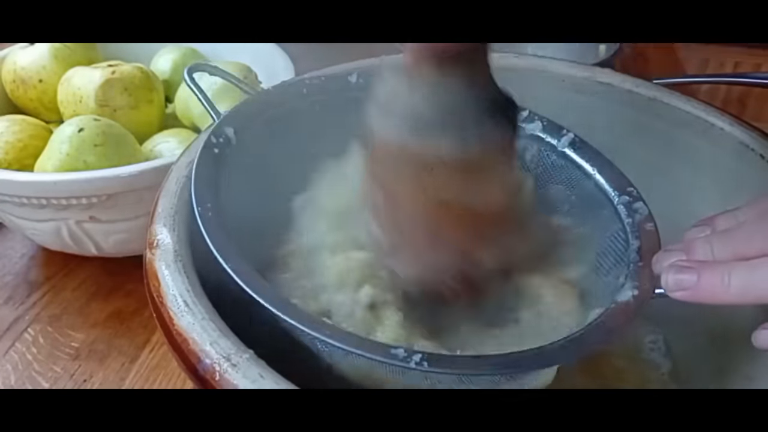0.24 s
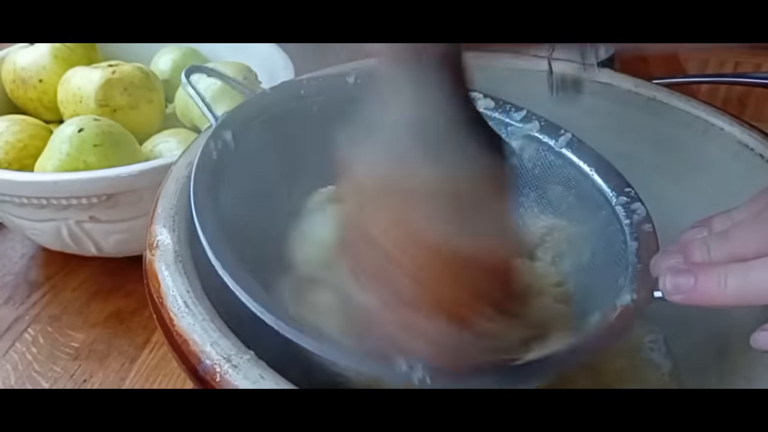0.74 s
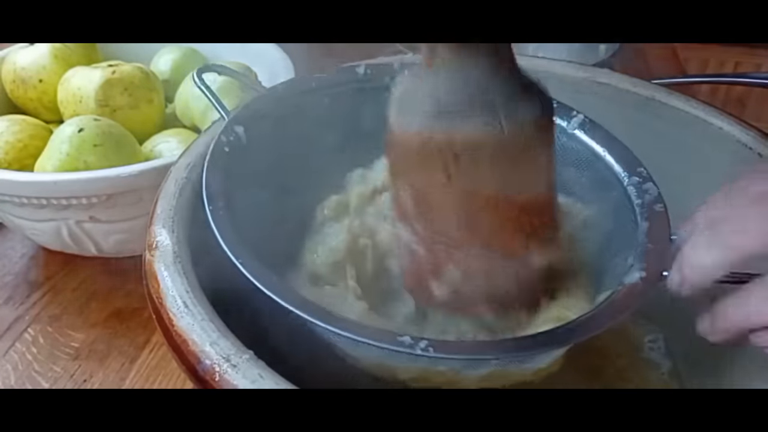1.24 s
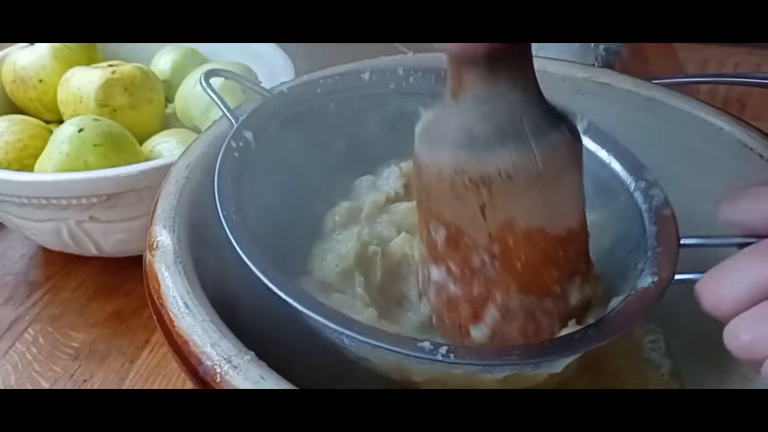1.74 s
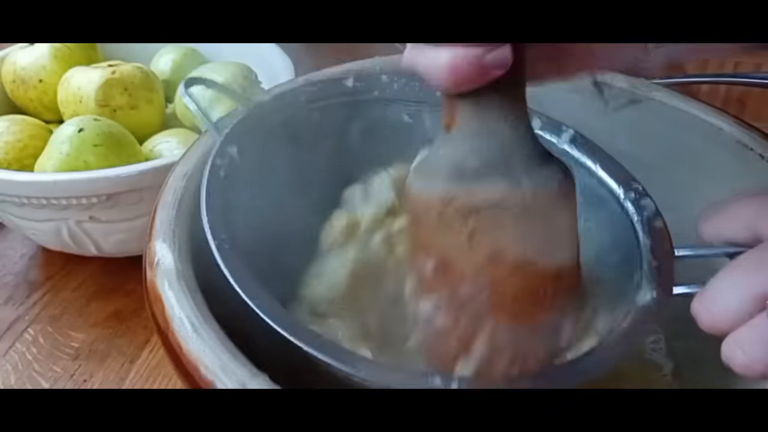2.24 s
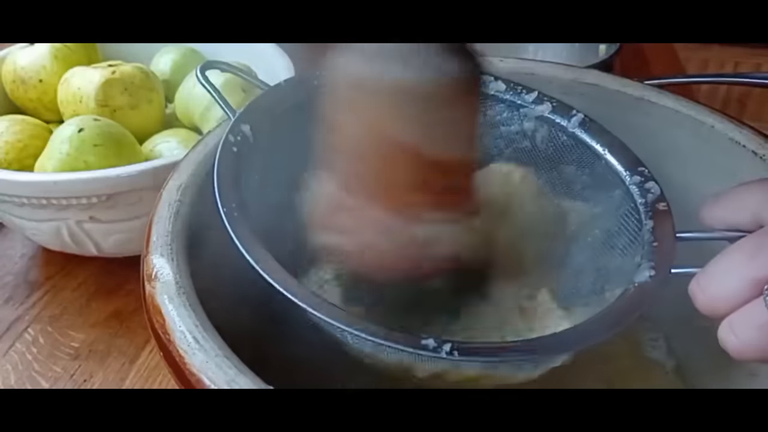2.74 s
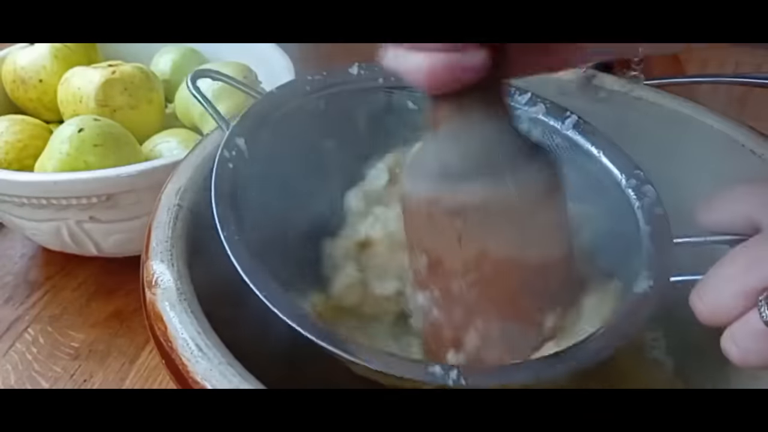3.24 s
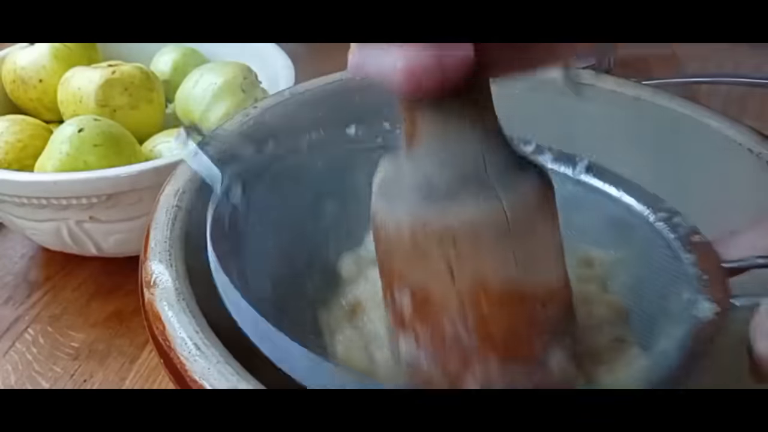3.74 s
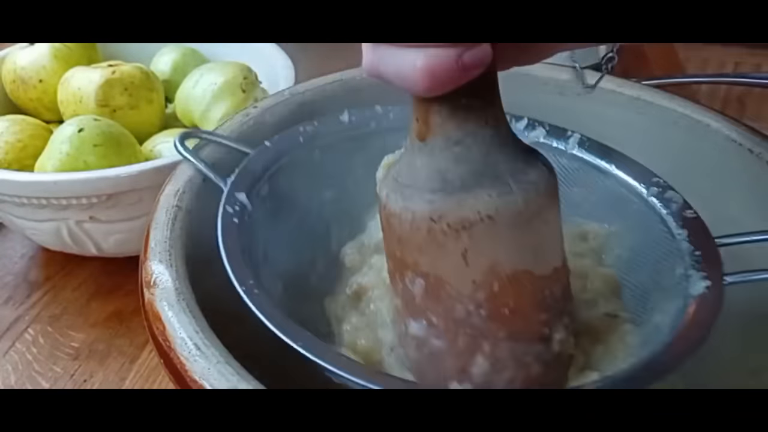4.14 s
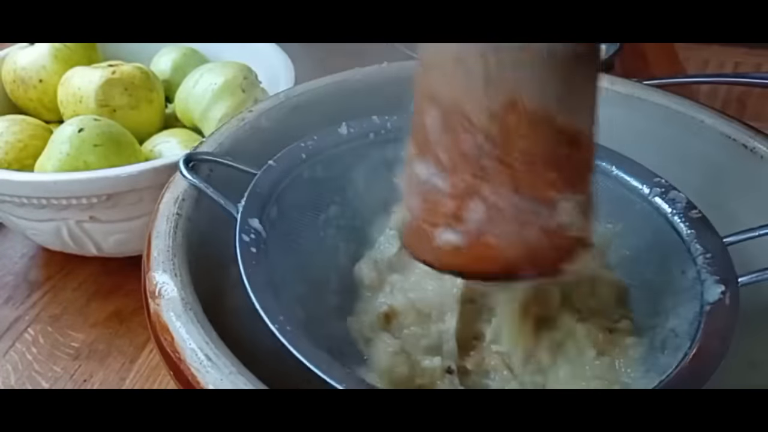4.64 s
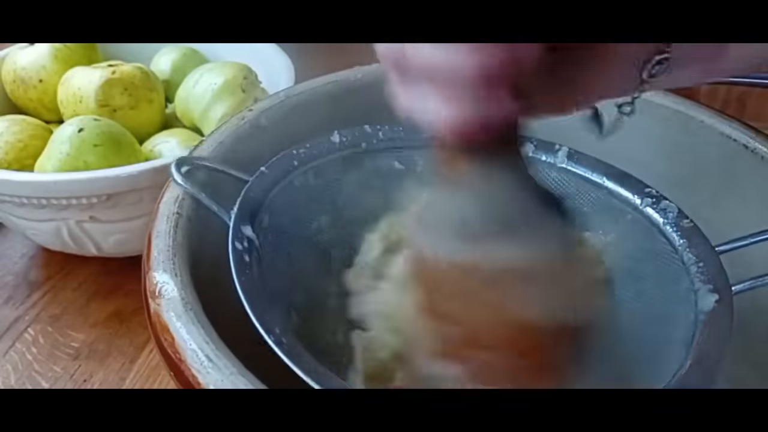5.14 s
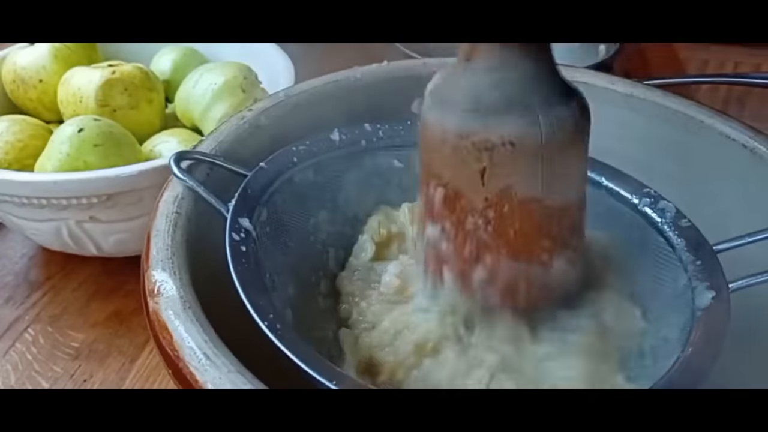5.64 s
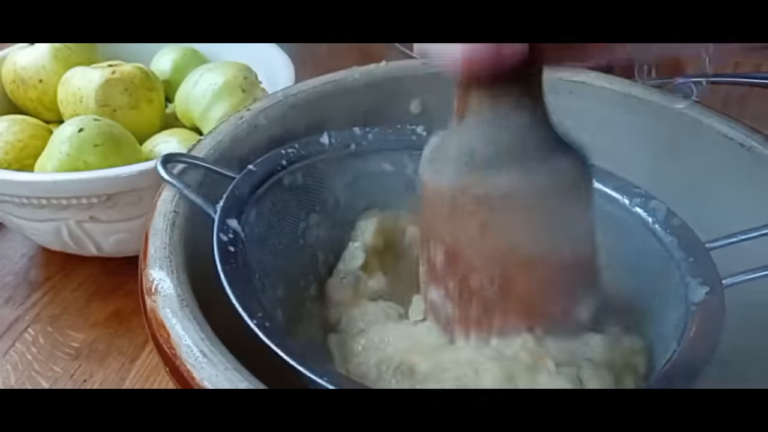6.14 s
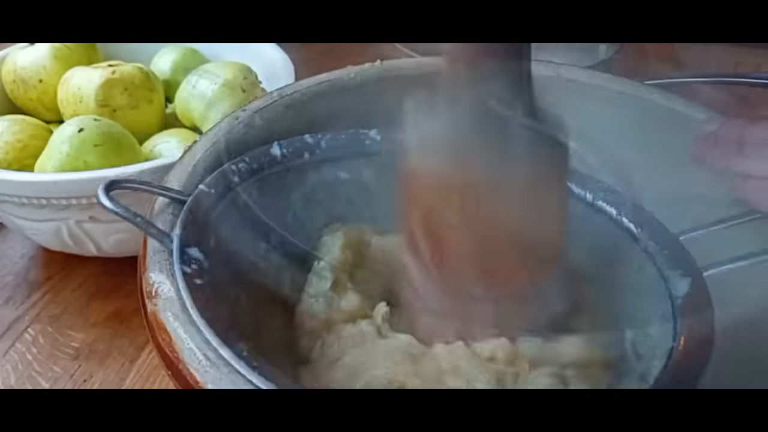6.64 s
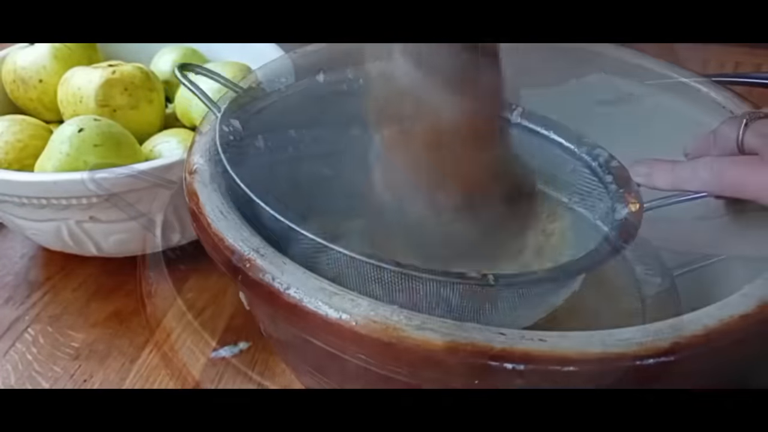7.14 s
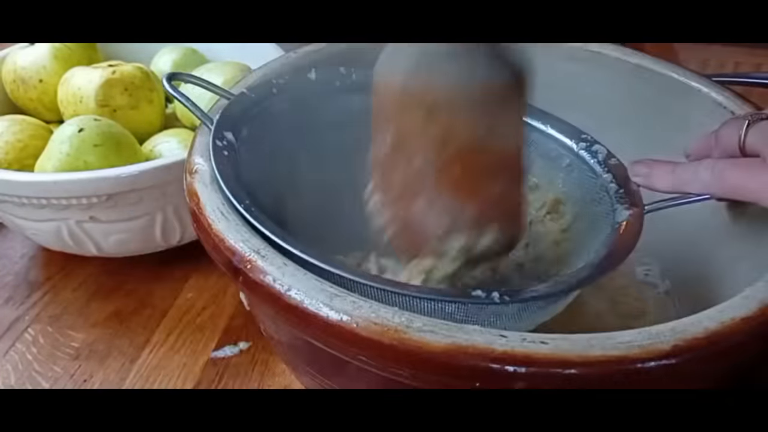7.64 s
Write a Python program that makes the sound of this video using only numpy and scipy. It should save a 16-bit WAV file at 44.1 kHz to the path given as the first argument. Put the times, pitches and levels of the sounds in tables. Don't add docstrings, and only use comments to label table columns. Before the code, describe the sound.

Irregular wet thuds and squelches of pulp pressed through a sieve, each with a crisp wire snap and dull stoneware knock. Early blows are separated by near silence; denser twisting follows, with sticky pops and rim rattles. After faint whistles of escaping air and a low table thump, steady brisk pounding runs on. Close stereo microphone, short dry kitchen reflections, very faint room murmur.

```python
import sys
import numpy as np
from scipy import signal
from scipy.fft import rfft, irfft, next_fast_len
from scipy.io import wavfile
from scipy.ndimage import map_coordinates

SR = 44100
rng = np.random.default_rng(int(sys.argv[2]) if len(sys.argv) > 2 else 0)


def boost_factor(decibels):
    exponent = np.asarray(decibels, float) / 20
    return 10 ** exponent


def to_wav(sig):
    pcm = np.clip(np.atleast_2d(sig), -1, 1) * 32767
    pcm = np.round(pcm).astype(np.int16)
    wavfile.write(sys.argv[1], SR, pcm.T)


N = 347943


def rms_one(x):
    return x / np.sqrt(np.mean(x ** 2) + 1e-20)


def in_time(rows):
    s, *columns = np.transpose(rows)
    return [np.interp(np.arange(N) / SR, s, column) for column in columns]


def at_hz(points, hz):
    table_hz, value = np.transpose(points)
    return np.interp(np.log(hz), np.log(table_hz), value)


def colour(x, points, size=4096):
    hz = np.maximum(np.arange(size // 2 + 1), 1) * SR / size
    cepstrum = irfft(np.log(boost_factor(at_hz(points, hz))))
    cepstrum[1:size // 2] *= 2
    cepstrum[size // 2 + 1:] = 0
    kernel = irfft(np.exp(rfft(cepstrum)))
    return signal.oaconvolve(np.atleast_2d(x), [kernel / np.linalg.norm(kernel)])[:, :N]


def above(x, hz):
    return signal.sosfilt(signal.butter(4, hz, "high", fs=SR, output="sos"), x)


def drift(rate):
    r = np.exp(-80 * np.pi * rate / SR)
    slow = signal.lfilter([1], [1, -2 * r, r * r], rng.standard_normal(N // 40 + 2002))[2000:]
    return np.interp(np.arange(N) / 40, np.arange(len(slow)), rms_one(slow))


def ring(x, hz, t60):
    r, w = boost_factor(-60 / (t60 * SR)), 2 * np.pi * hz / SR
    return signal.lfilter([0, np.sin(w)], [1, -2 * r * np.cos(w), r * r], x + 1e-18)


def rough():
    return np.clip(2 * rng.standard_normal(N), -1.2, 1.2)


def grains(per_s, spread_db):
    sizes = boost_factor(spread_db * np.minimum(rng.exponential(1, N), 5)) * rng.choice([-1, 1], N)
    return rms_one(sizes * (rng.random(N) < per_s / SR))


def struck(body, force, at):
    since = np.searchsorted(at, np.arange(N), side="right")
    uneven = boost_factor(rng.uniform(-3, 3, (len(body), len(at) + 1)))
    return sum(boost_factor(db) * ring(force * share[since], hz, t60) for share, (hz, db, t60) in zip(uneven, body))


def bursts(at, db, fall_s):
    clicks = np.zeros(N)
    clicks[at] = boost_factor(db)
    return signal.lfilter([1], [1, -np.exp(-1 / (fall_s * SR))], clicks + 1e-18)


def swells(s, db, rise_s, fall_s, rest_db, hold_s=0, lead_s=9):
    t = np.arange(0, N + 64, 64)[:, None] / SR
    slope = np.maximum(s - t, 0) / rise_s + np.maximum(t - s - hold_s, 0) / fall_s
    power = boost_factor(db - 40 * slope) ** 2 * (t > s - lead_s) + 1e-30
    total = power.sum(axis=1) + boost_factor(rest_db) ** 2
    level_db = np.interp(np.arange(N) / SR, t[:, 0], 10 * np.log10(total))
    return level_db, power / power.sum(axis=1)[:, None]


def swell_and_die(events):
    out, t = np.zeros(N + 8000), np.arange(8000) / SR
    for s, db, hz, cycles in events:
        age = t * hz / max(cycles, .5) * 2
        start = int(s * SR)
        out[start:start + 8000] += boost_factor(db - 3.0) * age * np.exp(1 - age) * np.sin(2 * np.pi * hz * t)
    return out[:N]


# f/Hz, likeness -1..1
PORT_LIKENESS = [(60, 0.64), (240, 0.99), (950, -0.35), (3770, 0.8), (15000, -0.061)]
PATCHES_PER_OCTAVE, STREAK_SHARE, PATCH_DB, FLICKER_DB = 3.5, 0.59, 5.5, 3


def wide_noise(patchy_db=0):
    mid, side = signal.stft(rng.standard_normal((2, N)), nperseg=256)[2]
    alike = np.clip(at_hz(PORT_LIKENESS, (np.arange(129) + .5) * SR / 256), -1, 1)[:, None]
    octaves = PATCHES_PER_OCTAVE * np.log2(np.arange(1, 130))
    pitch, time = np.meshgrid(octaves, np.arange(mid.shape[1]) / 8, indexing="ij")
    patches = map_coordinates(rng.standard_normal((40, N // 1024 + 3)), [pitch, time], order=1)
    lanes = rng.standard_normal((129, N // 2048 + 3))
    streaks = map_coordinates(lanes, [np.indices(time.shape)[0], time / 2], order=1)
    gain = boost_factor(patchy_db * patches) * boost_factor(STREAK_SHARE * patchy_db * streaks)
    both = gain * (np.sqrt(1 + alike) * mid + np.sqrt(1 - alike) * side * [[[1]], [[-1]]])
    return rms_one(signal.istft(both, nperseg=256)[1][:, :N])


def at_ports(x, lag_s):
    size = next_fast_len(N)
    spin = np.exp(-2j * np.pi * np.arange(size // 2 + 1) * SR / size * lag_s)
    return np.array([irfft(rfft(x, size) * spin, size)[:N], x])


# f/Hz, level/dB
AIR_COLOUR = [(15, -73.5), (25, -35.5), (109, 13.5), (1610, -29), (2360, -20.5), (2710, -34.5), (3560, -34),
              (6130, -17), (8270, -47.5), (10600, -15), (13500, -58), (15500, -9), (16800, -53)]


def still_air():
    return boost_factor(-66) * colour(wide_noise(3.0), AIR_COLOUR)


def electronics():
    return boost_factor(-75) * np.sin(2 * np.pi * 15470 * np.arange(N) / SR)


KITCHEN_T60_S, WALL_CUT_HZ, KITCHEN_DB = 0.27, 7600, -23.5


def kitchen(x):
    size = next_fast_len(N + SR)
    spin = -2j * np.pi * np.arange(size // 2 + 1) / size
    dull, out = 1 / (1 - spin * SR / (2 * np.pi * WALL_CUT_HZ)), [0, 0]
    for k, lag in enumerate((rng.uniform(0.01, 0.033, 16) * SR).astype(int)):
        loop = boost_factor(-60 * lag / SR / KITCHEN_T60_S) * dull * np.exp(spin * lag)
        out[k % 2] = out[k % 2] + (-1) ** (k // 2) * loop / (1 - loop)
    return boost_factor(KITCHEN_DB) * irfft(np.array(out) * rfft(x, size), size)[:, :N]


# f/Hz, level/dB
TABLE_COLOUR = [(15, -17), (25, -30), (156, 1.5), (228, -2.5), (260, -6.5), (297, -5.5), (350, -19.5),
                (460, -30.5), (770, -120)]
# f/Hz, level/dB, t60/s
TABLE_MODES = [(104.2, -1, .3), (174, -7.5, 0.043), (210.6, -2, 0.25), (292.5, 1, 0.19)]
# t/s, level/dB
SHOVES = [(2.33, -53), (2.72, -45.5), (2.93, -49), (3.11, -46.5), (3.34, -48.5), (3.53, -49.5), (3.74, -55),
          (4.17, -49.5), (4.495, -28), (4.72, -52), (5.199, -55), (5.5, -42.5), (6.08, -62), (6.9, -43.5),
          (7.0, -47.5), (7.24, -42.5), (7.491, -29.5), (7.82, -34)]
SHOVE_RISE_S, SHOVE_HOLD_S, SHOVE_FALL_S, TABLE_REST_DB = 0.098, 0.042, 0.11, -66


def table(at, bowl_db):
    shove_db, _ = swells(*np.transpose(SHOVES), SHOVE_RISE_S, SHOVE_FALL_S, TABLE_REST_DB, SHOVE_HOLD_S)
    shove_db = np.minimum(shove_db, np.maximum(bowl_db + 10.0, -56))
    rumble = colour(boost_factor(shove_db - 5.5 + FLICKER_DB * drift(28)) * wide_noise(), TABLE_COLOUR)
    force = (boost_factor(shove_db - 37.5) + boost_factor(-102 + 2.2 * drift(6.2))) * rough()
    return rumble + struck(TABLE_MODES, force, at)


# t/s, level/dB, f/Hz, length/cycles
HUMS = [(.04, -52, 95, 6.0), (.93, -52, 60, 4.0), (1.9, -48, 100, 7.0), (2.0, -48, 95, 7.0),
        (2.46, -50, 297, 14.0), (3.13, -44, 295, 12.0), (3.33, -42, 105, 6.0), (3.53, -44, 105, 6.0),
        (4.26, -46, 95, 6.0), (4.705, -40, 100, 8.0), (6.07, -44, 100, 8.0), (6.14, -40, 470, 14.0),
        (4.37, -38, 450, 12.0)]


def hums():
    return swell_and_die([(s, db - 4.0, hz, cycles) for s, db, hz, cycles in HUMS])


# t/s, level/dB, f/Hz, length/cycles
BUMPS = [(0.167, -32, 450, 2.2), (0.504, -41, 452, 2.2), (1.104, -29, 443, 2.6), (2.242, -43, 498, 2.5),
         (2.359, -34, 475, 2.5), (2.599, -38, 283, 2.9), (2.699, -33, 377, 2.5), (2.914, -29, 457, 2.5),
         (3.109, -50, 301, 2.3), (3.252, -29, 464, 2.1), (3.349, -33, 468, 2.5), (3.819, -33, 418, 2.5),
         (4.153, -43, 110, 2.5), (4.419, -38, 436, 2.8), (4.487, -20.5, 354, 2.6), (4.504, -21.5, 199, 2.5),
         (4.522, -24, 260, 2.5), (4.539, -21, 154, 2.4), (4.559, -22, 210, 2.2), (4.609, -39, 167, 2.5),
         (4.679, -44, 111, 2.5), (5.199, -41, 468, 2.9), (5.459, -41, 479, 2.5), (5.519, -41, 226, 2.5),
         (6.355, -17.5, 514, 3), (6.379, -25, 452, 2.7), (6.81, -31, 479, 2.5), (6.874, -37, 460, 2.5),
         (6.941, -34, 456, 2.5), (7.019, -34.5, 135, 2.3), (7.239, -38, 161, 2.5), (7.281, -33, 169, 2.5),
         (7.462, -27.5, 132, 2.1), (7.509, -23, 237, 2.3), (7.529, -30, 234, 2.5), (7.559, -34, 135, 2.5),
         (7.599, -37, 164, 2.3), (7.799, -28.5, 374, 2.6), (7.839, -28, 304, 2.5)]


def bumps():
    return swell_and_die(BUMPS)


# t/s, f/Hz, level/dB
SQUEAKS = [
    [(3.93, 11300, -79.5), (3.978, 12430, -81), (4.09, 10700, -59)],
    [(3.95, 7500, -66), (4.0, 7560, -60), (4.08, 7000, -62)],
    [(4.66, 10800, -77), (4.69, 11220, -71), (4.76, 8850, -101)],
    [(4.98, 10700, -63.5), (5.004, 11620, -75), (5.12, 10390, -59)],
]


def squeaks():
    out, t = np.zeros(N), np.arange(N) / SR
    for rows in SQUEAKS:
        hz, db = in_time(rows)
        fade = np.clip(np.minimum(t - rows[0][0], rows[-1][0] - t) / 0.015, 0, 1)
        phase = 2 * np.pi * np.cumsum(hz * (1 + .004 * drift(100))) / SR
        out += fade * boost_factor(db - 1 + 5.9 * drift(40)) * np.sin(phase)
    return out


# t/s, level/dB, f/Hz
PLOPS = [(0.224, -40, 851), (0.781, -40, 929), (1.186, -34, 918), (1.265, -36, 813), (2.332, -27, 802),
         (2.359, -27, 1000), (2.687, -15, 773), (2.739, -28, 794), (2.976, -35, 982), (3.087, -29, 904),
         (3.787, -32, 1240), (3.826, -26, 1020), (5.189, -33, 1410), (5.258, -45, 1750), (5.476, -33, 912),
         (5.512, -37, 888), (6.399, -29, 1400), (6.534, -38, 1440), (6.672, -29, 1930), (6.79, -23, 845),
         (6.879, -34, 840), (7.224, -34, 1870)]


def plops():
    return swell_and_die([(s, db - 6, hz, 7.0) for s, db, hz in PLOPS])


# f/Hz, level/dB
KNOCK_COLOUR = [(120, -49), (200, -23), (391, -2), (453, 4), (719, -11), (1600, -13), (2080, -49),
                (3520, -120)]
# f/Hz, level/dB, t60/s
BOWL_MODES = [(287, -3.5, 0.26), (364, -5.5, 0.38), (468.5, 3, 0.24), (596.4, 6, 0.13), (900, -0.5, 0.26)]


def bowl(at, knock_db, bowl_db):
    knock = bursts(at, knock_db - 9.0, 0.002) * rough() + boost_factor(bowl_db - 12.5) * grains(300, 2.86)
    direct = above(colour(knock, KNOCK_COLOUR)[0], 150) + boost_factor(-33.5) * struck(BOWL_MODES, knock, at)
    haze = boost_factor(bowl_db - 4.5 + FLICKER_DB * drift(27)) * wide_noise(PATCH_DB)
    return direct, above(colour(haze, KNOCK_COLOUR), 160)


# t/s, level/dB
TICKS = [(0.1131, -40), (0.2229, -32), (0.4743, -38), (1.0884, -29), (1.1314, -39), (1.519, -36),
         (2.7884, -34), (3.3448, -28.5), (3.462, -47), (3.494, -44), (3.5347, -38), (3.6277, -41),
         (3.6711, -38), (3.7547, -39), (3.7886, -25), (3.8255, -19.5), (3.8927, -28), (3.9409, -40),
         (4.0746, -40), (4.0956, -37), (4.136, -33), (4.1664, -27), (4.2143, -34), (4.3734, -38),
         (5.1225, -45), (5.2589, -39), (5.2994, -45), (5.3368, -56), (5.4744, -32), (5.5119, -38),
         (6.0744, -20), (6.454, -27), (6.5347, -36), (6.6124, -44), (6.6443, -35), (6.7812, -29),
         (6.8792, -31), (7.0075, -32), (7.0219, -26.5), (7.0848, -41), (7.1364, -49), (7.1516, -33),
         (7.1641, -32), (7.3144, -33), (7.352, -38), (7.38, -37), (7.5065, -19), (7.6313, -28)]


def ticks():
    s, db = np.transpose(TICKS)
    return s, bursts(np.round(s * SR).astype(int), db, 0.0014) * rough()


# t/s, level/dB
RIM_FREEDOM = [(0.0, -14.5), (.24, -4.5), (.85, -4), (1.65, 2.5), (2.3, -6), (2.75, -1.5), (3.15, -6),
               (3.8, 1.5), (4.1, 0.5), (4.69, 2.5), (4.75, -25.5), (5.33, -1.5), (5.68, -23), (5.86, -5),
               (6.1, -8), (6.74, -4), (7.11, 0.5), (7.6, -11.5), (7.89, -3.5)]


def rim_freedom():
    return in_time(RIM_FREEDOM)[0]


# f/Hz, level/dB, t60/s
RIM_MODES = [(1247, -9.5, 0.091), (1940, -11.5, 0.08), (2325, 4, 0.07), (2430, 5, 0.06), (3575, -1.5, .07),
             (4900, -8.5, 0.04), (5250, -7, 0.02), (5620, -5, 0.022), (6120, -8, 0.03), (6710, -12, 0.05)]


def rim(at, rim_db, squelch_db, crack, tick_s, tick):
    drag = boost_factor(-23) * crack + boost_factor(squelch_db - 23.0) * grains(800, 3.0)
    force = boost_factor(rim_db + 2.5 * drift(14.0)) * drag + boost_factor(-24.5) * tick
    return boost_factor(2.8 * drift(35)) * struck(RIM_MODES, force, np.sort(np.r_[at, tick_s * SR]))


CRACK_S, TAIL_DB = .0003, -23
# f/Hz, level/dB
FIZZ_COLOUR = [(4880, -44), (8300, -5), (10000, 2.5), (11300, -3), (13000, -26), (15200, -5), (16100, -28),
               (16500, -33.5), (16800, -41)]


def fizz(at, bright_db, grind_db):
    crisp = bursts(at, bright_db + 0.5, CRACK_S) * rough() + boost_factor(grind_db - 6) * grains(1500, 5)
    tail = bursts(at, bright_db + TAIL_DB, 0.011) + boost_factor(grind_db - 1.5 + FLICKER_DB * drift(43))
    direct = above(colour(crisp, FIZZ_COLOUR)[0], 6700)
    return direct, above(colour(tail * wide_noise(PATCH_DB), FIZZ_COLOUR), 9200)


def blobs(per_s, low_hz, high_hz, cycles):
    clicks, dealt = grains(per_s, 2.1), rng.integers(0, 12, N)
    pitches = np.geomspace(low_hz, high_hz, 12)
    clumps = boost_factor(7 * drift(20))
    sizes = [clicks * (dealt == k) * np.roll(clumps, k * N // 12) for k in range(12)]
    return rms_one(sum(ring(size, hz, cycles / hz) * np.sqrt(hz) for size, hz in zip(sizes, pitches)))


def pops(at, db, pitch_hz, crack_db):
    out, t = np.zeros(N + 900), np.arange(900) / SR
    hisses = rng.standard_normal((len(at), 900))
    for i, level_db, hz, broad_db, hiss in zip(at, db, pitch_hz, crack_db, hisses):
        burst = np.sin(2 * np.pi * hz * t) * np.exp(-t * hz / (5.5 - 0.45 * broad_db))
        splutter = rms_one(ring(hiss, hz, 33.0 / hz)) * np.exp(-t / .005)
        out[i:i + 900] += boost_factor(level_db) * burst + boost_factor(level_db - 7.0) * splutter
    return out[:N]


# f/Hz, level/dB
SQUELCH_COLOUR = [(410, -44.5), (700, -9.5), (1000, -7.5), (1530, -15), (1880, -9), (3520, -8), (8200, -4),
                  (10700, -50.5), (18000, -120)]


def squelch(at, db, hz, crack_db, wet_db, crack):
    wet = crack + boost_factor(wet_db - 3) * blobs(1800, 855, 7400, cycles=23.7)
    tail = bursts(at, db + crack_db + TAIL_DB, 0.01) + boost_factor(wet_db - 3.5 + FLICKER_DB * drift(50))
    direct = above(colour(wet, SQUELCH_COLOUR)[0] + pops(at, db, hz, crack_db), 540)
    return direct, above(colour(tail * wide_noise(PATCH_DB), SQUELCH_COLOUR), 780)


# t/s, squelch level/dB, fizz level over squelch/dB, bowl level/dB, 40 dB drain/s
BLOWS = [(.169, -41, -10.5, -34.5, 0.2854), (0.505, -44.5, -15.5, -43, 0.24), (0.811, -36, -5, -41, 0.19),
         (1.108, -43, -3.5, -38, 0.36), (1.409, -57, -37, -57, 0.3), (1.515, -53, -42, -49, 0.2),
         (1.825, -54, -24, -62, 0.16), (2.24, -33, 0, -40.5, 0.19), (2.572, -42.5, -5.5, -40, 0.58),
         (2.898, -35.5, -4.5, -32.5, 0.37), (3.25, -40, -4.5, -42, 0.23), (3.722, -49, -29, -57, 0.54),
         (4.501, -36.5, -6.5, -30, 0.25), (4.876, -43, -2.5, -50, 0.25), (5.18, -35.5, -6.5, -37.5, 0.19),
         (5.475, -37.5, -6, -36.5, 0.2042), (5.755, -38.5, -9.5, -40, 0.25), (6.068, -33.5, -5, -51, 0.18),
         (6.375, -35, -3, -28.5, 0.34), (6.913, -53, -16, -39, 0.28), (7.169, -39, -6, -40, 0.2),
         (7.478, -31, -1, -24.5, 0.18), (7.226, -31, -9, -37, 0.02), (7.811, -34.5, -6, -31, 0.45),
         (4.101, -46, -11, -48, .4), (4.17, -41.5, -14.5, -44.5, 0.26), (4.379, -48, -10.5, -42.5, .4),
         (6.458, -39.5, -7, -51, 0.37), (6.792, -34, -5.5, -34.5, 0.26), (7.025, -35, -1.5, -38, 0.1),
         (7.142, -53, -1, -57, 0.4), (7.319, -39.5, -5, -54, 0.11), (7.383, -49, -17, -53, 0.08),
         (2.66, -43.5, -1, -45, .3), (7.535, -35, -4.5, -35, 0.14)]
# t/s, squelch level/dB, fizz level over squelch/dB, bowl level/dB
TWISTS = [(0.02, -63.5, -4.5, -66), (.6, -53, 5, -62), (.77, -63, 7, -76.5), (1.273, -48, -8.5, -38),
          (1.775, -62, -20, -66), (2.048, -61.5, -2.5, -55.5), (2.362, -34, -6, -30.5),
          (2.704, -32.5, -3.5, -27.5), (2.809, -46, -6, -50), (2.99, -41.5, -7, -43),
          (3.061, -49, -5, -31.5), (3.358, -39.5, -11.5, -36), (3.522, -48.5, -11, -43.5),
          (3.623, -45, -8, -38), (3.823, -30, -9, -31.5), (3.93, -48.5, -23, -43.5), (4.14, -50, -12, -48),
          (4.22, -50.5, -17, -50), (4.329, -51, -10, -64), (4.435, -59, -16, -41.5), (4.65, -54, -12, -64),
          (5.14, -62, -4, -74), (5.579, -55.5, -11, -47), (5.84, -54, -3, -44), (6.162, -55, -10, -46),
          (6.52, -44.5, -5, -52), (6.609, -49.5, -10, -54), (6.706, -40, -4, -45), (6.835, -37, -8, -34.5),
          (6.88, -40, -8.5, -37), (7.09, -60, -14, -53), (7.275, -44, -7, -49), (7.35, -44, -5.5, -56),
          (7.634, -41, -1.5, -58)]
BLOW_RISE_S, TWIST_RISE_S, TWIST_FALL_S, BOWL_DRAIN, REST_DB = 0.059, .18, .14, 0.78, -84.5
BLOW_LEAD_S, TWIST_LEAD_S = 0.03, 1


def strokes():
    rows = [(*row[:4], BLOW_RISE_S, row[4], BLOW_LEAD_S) for row in BLOWS]
    rows += [(*row, TWIST_RISE_S, TWIST_FALL_S, TWIST_LEAD_S) for row in TWISTS]
    s, squelch_db, fizz_db, bowl_db, rise_s, fall_s, lead_s = np.transpose(rows)
    wet, share = swells(s, squelch_db, rise_s, fall_s, REST_DB, 0, lead_s)
    stone, _ = swells(s, bowl_db, BOWL_DRAIN * rise_s, BOWL_DRAIN * fall_s, REST_DB, 0, lead_s)
    return wet, np.repeat(share @ fizz_db, 64)[:N], stone


# t/s, level/dB, pop f/Hz, knock level over peak/dB
THUDS = [(.1718, -24, 2660, 2), (.5042, -31, 940, 9.5), (1.102, -29.5, 3580, 8.5),
         (1.2643, -27.5, 2560, -6), (1.5024, -30, 2330, -1.5), (2.2588, -25, 2500, 5.5),
         (2.594, -32.5, 986, 6), (2.6988, -18.5, 1020, 2), (2.9144, -23.5, 954, 7.5),
         (3.0443, -17.5, 924, -4), (3.25, -22, 5030, 5), (3.2575, -23.5, 776, -8),
         (3.3976, -37.5, 900, 17.5), (3.709, -24, 2310, -16), (4.4947, -21, 5470, -4),
         (5.4348, -31.5, 856, -8), (5.4425, -32, 6800, -5), (5.4527, -26, 870, -18),
         (6.0525, -26, 1970, -25), (5.7475, -18.5, 3280, -9), (6.3557, -24.5, 810, 11),
         (6.3845, -29, 846, -10), (6.6965, -28.5, 1900, -6), (6.709, -27, 1900, -7), (6.8144, -29, 1064, 6),
         (6.8359, -25, 790, 3), (6.938, -24, 2360, -2.5), (6.948, -24.5, 4910, -3),
         (7.2185, -21.5, 2670, -7), (7.8017, -14.5, 1395, -11)]
# t/s, level/dB, broad crack level over peak/dB
SNAPS = [(0.154, -22, 5), (0.8097, -20, 7), (1.0015, -45, -27), (2.2318, -20.5, -4), (2.5853, -21.5, -4),
         (2.901, -21.5, 5), (4.474, -36.5, -18.5), (4.8514, -23.5, 4.5), (4.8654, -24, 8), (4.879, -29, 10),
         (4.887, -30, 8), (4.9722, -39, -7), (5.706, -37.5, 1.5), (5.7346, -25, 7.5), (6.0406, -23.5, 6.5),
         (6.7026, -22.5, -.5), (7.1977, -18, 6.5), (2.892, -23, 0), (7.7912, -28, 5), (2.788, -40, 0),
         (3.156, -44, -5), (5.275, -40, -7), (5.68, -49, -8), (7.4622, -18, 5), (7.549, -34, -14.5),
         (0.921, -43, -1), (6.357, -25, 3), (2.3929, -46, -17), (4.599, -40, -7.5), (5.35, -44.5, -24),
         (5.6505, -47.5, -17), (6.2484, -46.5, -20), (7.381, -46, 7)]
# t/s, level/dB, pop f/Hz, broad crack level over peak/dB
POCKETS = [(0.133, -35.5, 2660, 5), (.282, -33, 5300, -2), (0.4628, -40, 2360, 0.5),
           (0.4837, -37, 4300, -17), (0.6636, -38, 2720, 1.5), (0.704, -36, 7000, -19),
           (0.761, -21, 6800, -3), (0.7783, -22, 4240, -2.5), (1.395, -41, 5400, -5),
           (1.671, -43, 2380, -10), (1.8045, -36, 2370, 2), (1.808, -38, 5400, -5),
           (2.225, -22, 2540, 3.62), (5.5883, -38, 3120, -1), (2.5598, -19, 5970, 8),
           (2.5722, -24, 2620, -5), (3.1274, -24, 5550, -39), (3.192, -32, 1830, -18),
           (3.2148, -31, 2500, 4), (3.227, -22.5, 2610, -3), (3.8931, -31, 3580, -25),
           (4.8737, -27, 3120, 3), (5.1634, -29.5, 1547, -11), (5.1718, -16, 3070, 3),
           (6.2167, -39, 4220, -19), (6.0661, -23, 1960, 6.5), (6.0877, -25, 1940, 3),
           (6.1271, -21.5, 6650, -8.5), (6.3775, -19, 3130, 0), (7.5306, -20, 3440, 6),
           (7.6475, -24, 4500, -1)]
THUD_CRACK_DB, SNAP_KNOCK_DB, POCKET_KNOCK_DB, SNAP_HZ, SNAP_SCATTER = 5, -21.5, -28.5, 9970, 0.089


def contacts():
    rows = [(*row, THUD_CRACK_DB) for row in THUDS]
    scatter = rng.uniform(-1.2, 1, len(SNAPS))
    for (s, db, crack_db), u in zip(SNAPS, scatter):
        rows.append((s, db, SNAP_HZ * (1 + SNAP_SCATTER * u), SNAP_KNOCK_DB, crack_db))
    rows += [(s, db, hz, POCKET_KNOCK_DB, crack_db) for s, db, hz, crack_db in POCKETS]
    return np.transpose(sorted(rows))


def pestle():
    squelch_db, fizz_db, bowl_db = strokes()
    s, db, hz, knock_db, crack_db = contacts()
    at = np.round(s * SR).astype(int)
    rim_db = rim_freedom()
    wet_db = squelch_db - .45 * np.maximum(rim_db + 6.0, 0)
    bright_db = db + crack_db + np.clip(fizz_db[at], -25, 5)
    crack = bursts(at, db + crack_db + 1.5, CRACK_S) * rough()
    tick_s, tick = ticks()
    stone, stone_spread = bowl(at, db + knock_db, bowl_db)
    crisp, crisp_spread = fizz(at, bright_db, squelch_db + fizz_db)
    wet, wet_spread = squelch(at, db, hz, crack_db, wet_db, crack)
    pulp = wet + crisp + stone + bumps() + hums() + plops() + boost_factor(-9.5) * above(tick, 1500)
    spread = wet_spread + crisp_spread + stone_spread + table(at, bowl_db)
    return pulp, rim(at, rim_db, squelch_db, crack, tick_s, tick), spread


def scene():
    pulp, metal, spread = pestle()
    pulp = pulp + squeaks()
    room = kitchen(pulp + metal + spread[0])
    return at_ports(pulp, .00008) + at_ports(metal, 0.00018) + spread + room + still_air()


def top_cut(x):
    return signal.sosfilt(signal.butter(12, 17130, fs=SR, output="sos"), x)


def record(dry):
    heard = above(dry, 55) - 0.76 * signal.lfilter(*signal.iirpeak(7930, 8.0, fs=SR), dry)
    heard = signal.sosfilt(signal.cheby2(8, 50, 17200, fs=SR, output="sos"), heard)
    return top_cut(heard + electronics())


dry = scene()
out = record(dry)
to_wav(out)
```